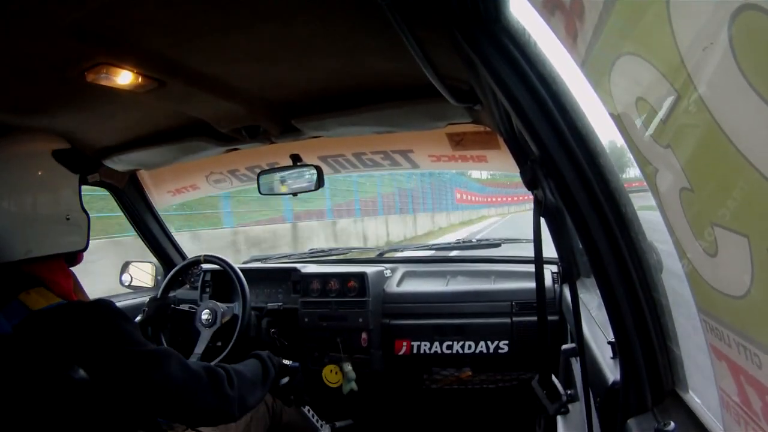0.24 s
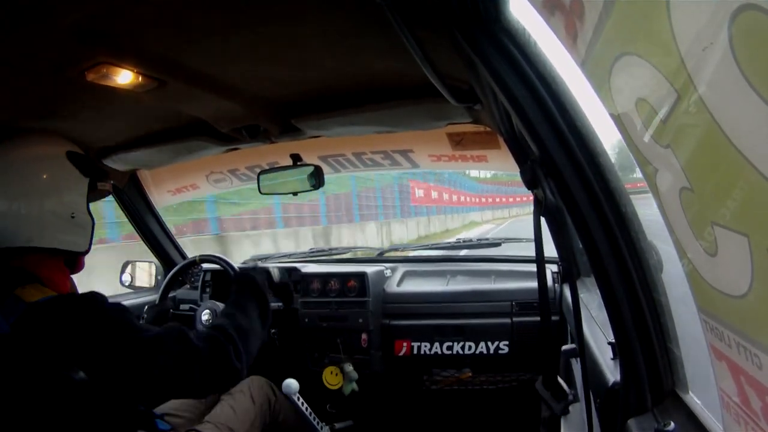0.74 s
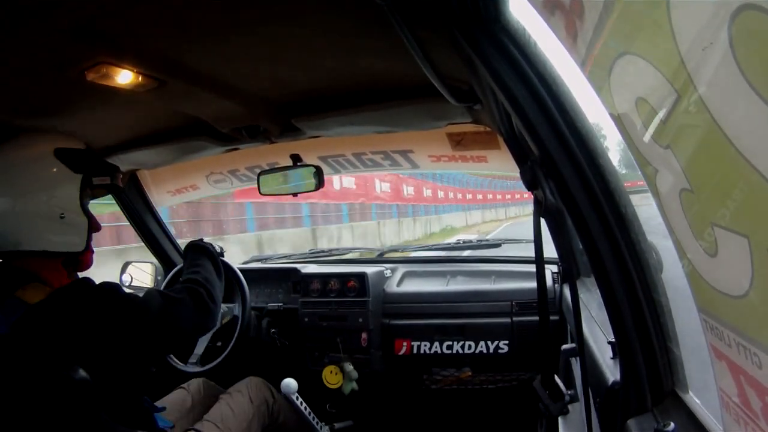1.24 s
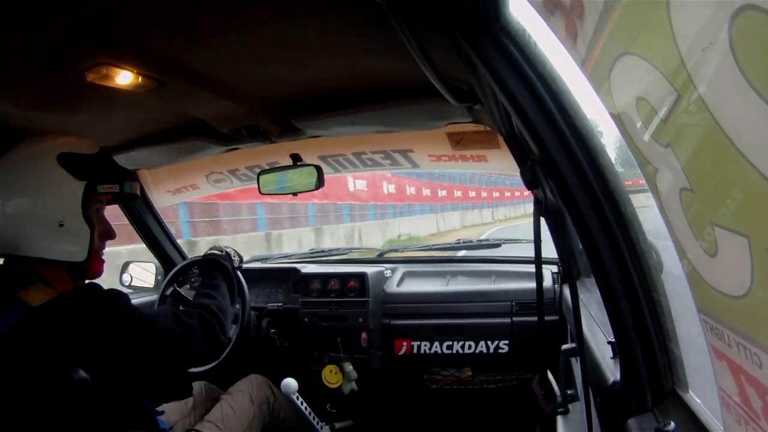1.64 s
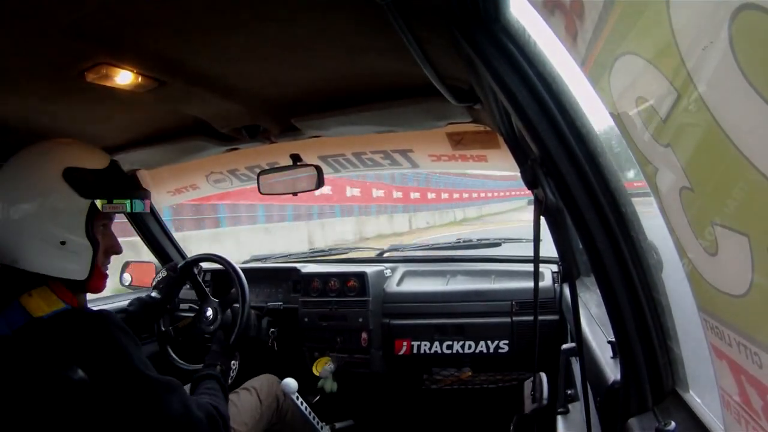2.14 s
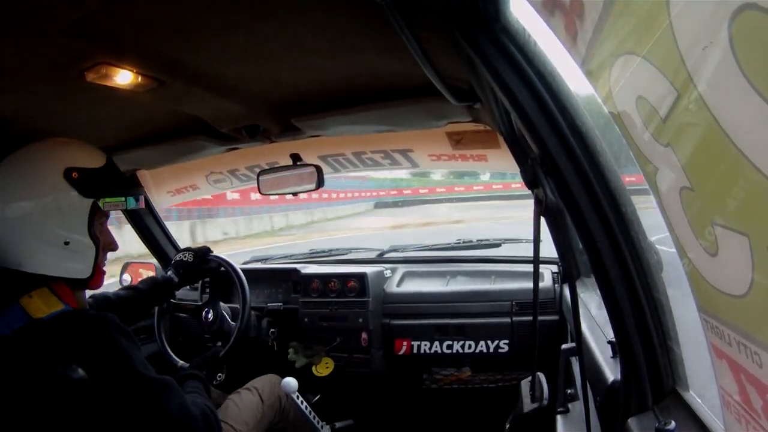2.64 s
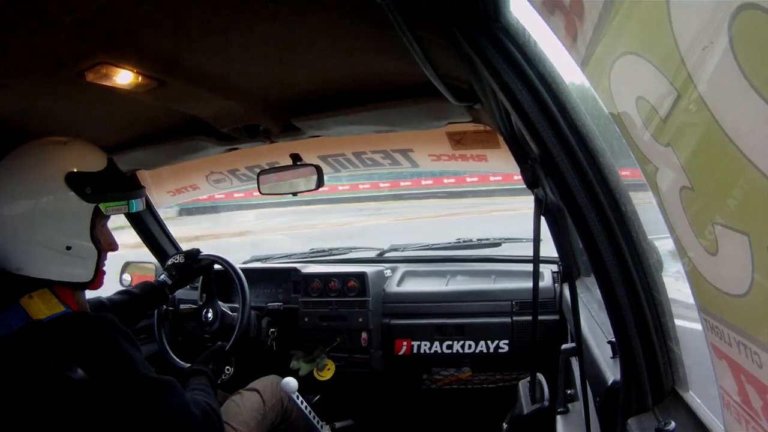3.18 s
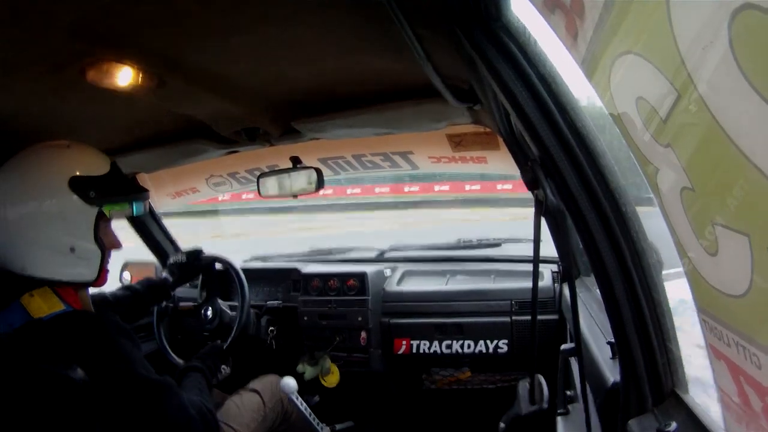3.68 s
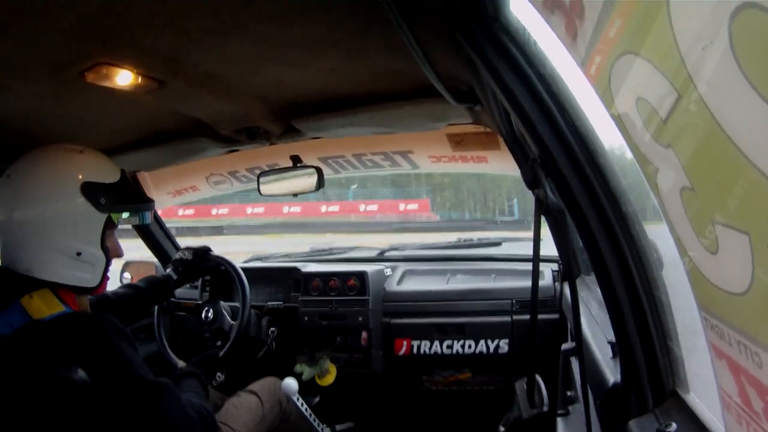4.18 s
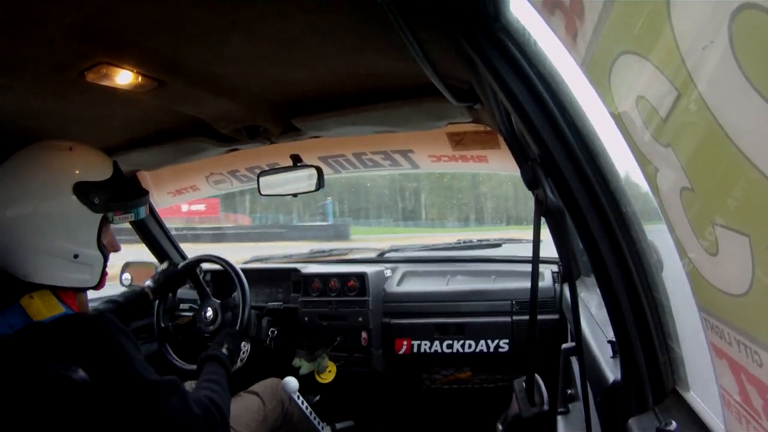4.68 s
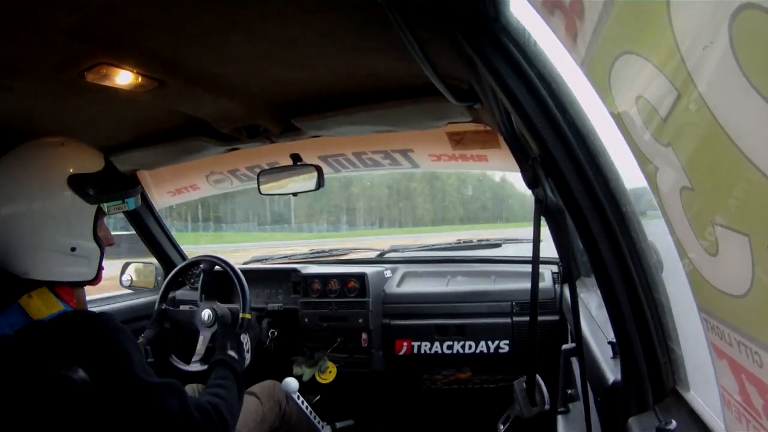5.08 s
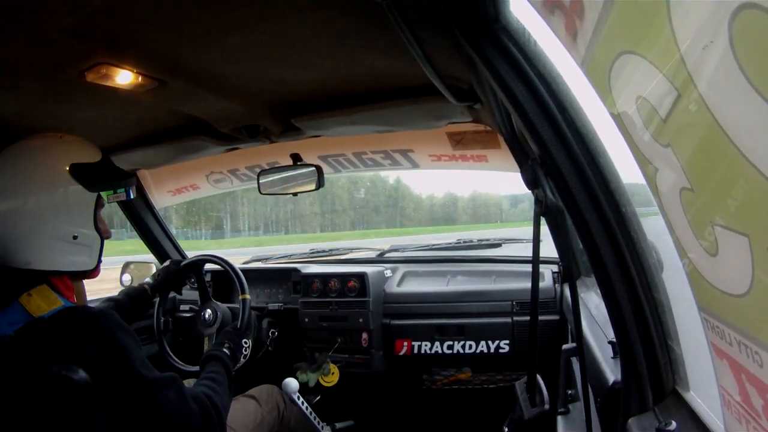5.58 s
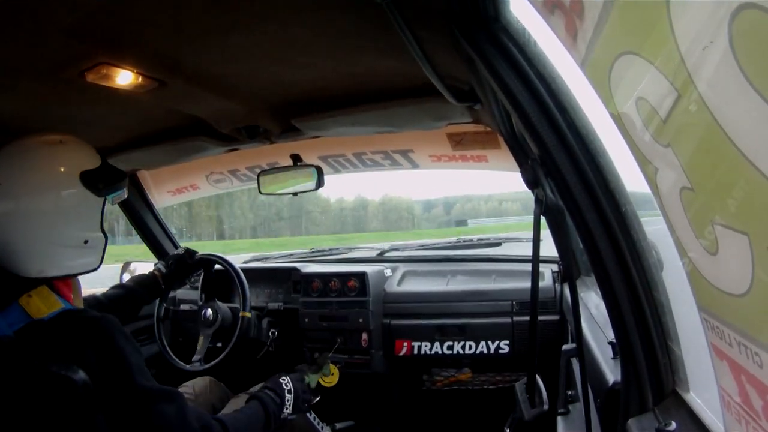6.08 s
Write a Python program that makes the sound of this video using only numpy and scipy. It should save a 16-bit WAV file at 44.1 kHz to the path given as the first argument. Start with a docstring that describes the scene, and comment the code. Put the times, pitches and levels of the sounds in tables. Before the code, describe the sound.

Inside a bare race car cabin, a four-cylinder engine flares, sags through a bend, takes a violent burst of knocks, then climbs again.

```python
"""Inside the bare cabin of a four-cylinder race car: the revs flare, sag through a bend and climb again.
Sines locked to the firings make the hum; filtered noise makes the boom, floor drumming, roar and whistle.
Loose trim ticks with the engine shake, and a bright crackle of clicked noise differs between the channels.
A kerb jolts the car into a burst of hard knocks, each a few dying modes with a thud and chatter.
All sources reach one microphone position, nearly mono, with brief dropouts and a faint hiss."""
import sys
import numpy as np
from scipy import signal
from scipy.fft import rfft, irfft
from scipy.io import wavfile
from scipy.ndimage import uniform_filter1d

SR = 44100
rng = np.random.default_rng(int(sys.argv[2]) if len(sys.argv) > 2 else 0)


def unload_audio(sound):
    """Save the sound as a 16-bit wav file, at the path given as the first command line argument."""
    columns = np.transpose(np.atleast_2d(sound))
    # keep every value between -1 and 1, then stretch to whole-number steps
    steps = np.round(np.clip(columns, -1, 1) * 32767)
    wavfile.write(sys.argv[1], SR, steps.astype(np.int16))


N = 278712


def undb(db):
    """Amplitude factor for a level in dB."""
    return 10 ** (np.asarray(db) / 20)


def unit(x):
    """Scale to an RMS of 1."""
    return x / np.sqrt(np.mean(x ** 2))


def curves(table):
    """Columns of a table joined by straight lines, one value a sample."""
    s, *columns = np.transpose(table)
    return [np.interp(np.arange(N) / SR, s, c) for c in columns]


def walk(rate):
    """Random levels held 1 / rate s and slewed twice; spread 1."""
    k = int(SR / rate)
    steps = np.repeat(rng.standard_normal(N // k + 1), k)
    return unit(uniform_filter1d(uniform_filter1d(steps, k), k)[:N])


def band(x, hz, width_hz):
    """One resonance, gain 1 at its centre."""
    return signal.lfilter(*signal.iirpeak(hz, hz / width_hz, SR), x)


def coloured(spectrum):
    """Noise of RMS 1 shaped by (f/Hz, level/dB) points joined on a logarithmic frequency axis."""
    hz, db = np.transpose(spectrum)
    bins = np.maximum(np.arange(N // 2 + 1) * SR / N, 1)
    gain = undb(np.interp(np.log(bins), np.log(hz), db))
    return unit(irfft(rfft(rng.standard_normal(N)) * gain, N))


def add(out, s, sound):
    """Mix a short sound in at time s."""
    i = int(s * SR)
    out[i:i + len(sound)] += sound[:N - i]


def ring(hz, t60, turn=0.):
    """A sine that dies by 60 dB in t60 seconds, starting at a given share of a turn."""
    t = np.arange(2048) / SR
    return np.sin(2 * np.pi * (hz * t + turn)) * np.exp(-np.log(1000) * t / t60)


def decay(t60):
    """A bare dying envelope from 1: a ring of 0 Hz that starts at its crest."""
    return ring(0, t60, .25)


def engine(hz, cycles, jolt):
    """A nearly pure firing tone; unequal cylinders add faint tones at quarters of its rate."""
    # firing tone, which swells and cancels as it sweeps through the shell's resonances: t/s, level/dB
    tones = [(0.0,-29.5),(0.11,-44),(0.21,-35),(0.37,-24),(0.455,-26),(0.478,-30),(0.495,-55),(0.535,-48),(0.56,-38),(0.6,-30),(0.7,-21.5),(0.99,-23),(1.09,-20.5),(1.3,-26),(1.52,-29.5),(1.65,-44),(1.75,-38.5),(2.4,-42.5),(2.8,-41.5),(2.99,-49),(3.2,-40.5),(3.6,-41.5),(3.72,-48),(4.2,-40),(4.45,-46.5),(4.6,-36.5),(5.35,-38),(5.7,-30.5),(6.0,-33.5),(6.07,-38),(6.16,-31),(6.32,-33)]
    # crank-turn tone before waver and kerb, against crank speed: f/Hz, level/dB
    crank = [(76, -58), (97, -55.5), (100.5, -41), (113, -39.5)]
    # how unevenly the cylinders fire: t/s, level/dB of in-between tones below rasp_hz, level/dB above
    uneven = [(0, -12, -4.5), (.6, -14, -9), (.9, -10, 2), (1.3, -1, 0.5), (1.8, -9, -7.5),
              (2.8, -6.5, -3.5), (3.7, -8, -4), (4.3, -6, 0), (5.3, 1, 0.5), (6.32, -9, 6)]
    # how an in-between tone gets through the shell, before the unevenness: f/Hz, level/dB
    through = [(38, -57), (50, -50.5), (80, -67), (117, -47), (140, -83), (235, -58), (290, -51),
               (315, -54.5), (350, -75.5), (400, -60.5), (480, -58.5), (600, -62), (680, -63.5), (750, -81),
               (930, -78), (1050, -66), (1200, -84.5), (1370, -75), (1500, -83), (1630, -75), (1850, -81.5)]
    # overtones against the firing tone: multiple of the firing rate, level/dB
    overtones = [(2, -37), (3, -29)]
    # multiples of the firing rate raised or lowered against their neighbours: multiple, level/dB
    offsets_db = dict([(2.75, 4), (3, -3), (3.5, 2)])
    rasp_hz = 330
    turn = 2 * np.pi * cycles

    tone_db, = curves(tones)
    crank_db = np.interp(hz / 2, *np.transpose(crank)) + 3 * walk(11) + 16 * jolt
    uneven_db, rasp_db = curves(uneven)
    through_hz, through_db = np.transpose(through)

    wavering_db = tone_db + 1.04 * walk(11) + 0.93 * walk(30)
    out = undb(wavering_db) * np.sin(turn + .1 * walk(7))  # phase wanders by 0.1 rad
    out += undb(crank_db) * np.sin(turn / 2)  # two firings a crank turn
    for multiple, db in overtones:
        overtone_db = db + tone_db + 2.5 * walk(5)
        out += undb(overtone_db) * np.sin(multiple * turn + .3 * walk(10))
    for multiple in [k / 4 for k in range(1, 48) if k not in (2, 4)]:
        line_hz = multiple * hz
        db = np.interp(np.log(line_hz), np.log(through_hz), through_db)
        db = db + np.where(line_hz < rasp_hz, uneven_db, rasp_db)
        db = db + offsets_db.get(multiple, 0) + 2.2 * walk(4)
        out += undb(db) * np.sin(multiple * turn + .15 * walk(9))
    return np.sqrt(2) * out  # levels are RMS


def cabin(cycles, boom_db, drum_db, roar_db):
    """Road shocks ring the air volume and floor pan; the roar pulses with firings, the shell sings evenly."""
    # body shell resonances in the roar: f/Hz, width/Hz, relative level/dB
    shell_modes = [(467.6, 80, 1.5), (916, 83, 3), (1337, 26.6, -7.5), (1631, 25, -6), (2035, 110, -10.5),
                   (3156, 39, -24), (3454, 124, -10.5), (3640, 120, -14), (4780, 870, -13.5)]
    # spectrum of the pulsing roar: f/Hz, relative level/dB per Hz
    roar_spectrum = [(13, -15), (22, -20), (102, -3), (159, -6.5), (253, -2), (352, -21.5), (462, -13.5),
                     (717, -10.5), (918, -14), (1180, -16.5), (1630, -15), (2400, -25.5), (2880, -26.5),
                     (3430, -29), (4040, -41), (15500, -92)]

    # the air volume holds one low note whose pitch wanders with the shocks
    note_level = np.sqrt(2) * undb(1.6 * walk(14))
    note = note_level * np.sin(2 * np.pi * np.cumsum(48 + 3.565 * walk(25)) / SR)
    rumble = unit(band(band(rng.standard_normal(N), 44.0, 24), 38.0, 30))
    boom = unit(note + 0.45 * rumble)

    drum = unit(band(band(band(rng.standard_normal(N), 229.6, 91), 207, 110), 223, 110))

    puffs = undb(1.5 * walk(80)) * (1 + .35 * np.sin(2 * np.pi * cycles))
    shell = np.zeros(N)
    for hz, width_hz, db in shell_modes:
        mode = band(band(rng.standard_normal(N), hz, 2 * width_hz), hz, width_hz)
        shell += undb(db) * unit(mode)
    roar = undb(-1.5) * unit(shell) + puffs * coloured(roar_spectrum)
    return undb(boom_db + 0.5) * boom + undb(drum_db + 0.5) * drum + undb(roar_db - 1.5) * roar


def strike(modes, spread, crack, rise_s):
    """One blow: a broad crack and modes slightly off pitch and level, after a brief rise; peak 1."""
    chance = rng.standard_normal((len(modes), 2))
    sound = np.zeros(2048)
    for (hz, db, t60), (detune, uplift) in zip(modes, chance):
        sound += undb(db + 2 * uplift) * ring(hz * (1 + spread * detune), t60)
    noise = band(band(rng.standard_normal(2048), 6500, 3800), 6500, 4400)
    rise = 1 - np.exp(-np.arange(2048) / SR / rise_s)
    sound = (sound + crack * noise * decay(0.0081)) * rise
    return sound / np.abs(sound).max()


def trim(cycles, shake_db):
    """Each firing may throw a loose part at its neighbour: it lands a tap or barely touches, in runs."""
    # loudest ticks of the trim: t/s, peak level/dB
    loud_ticks = [(0.0084, -37), (0.0232, -43), (0.031, -42), (0.0373, -48.5), (0.0414, -47), (0.053, -45),
                  (0.2423, -41), (0.2947, -40.5), (0.3787, -43), (0.398, -34), (0.4209, -33), (0.4353, -34),
                  (0.4515, -38), (0.576, -40), (0.5887, -35), (0.624, -43), (0.6431, -39), (0.6512, -37),
                  (0.6666, -29), (0.6784, -40), (0.7023, -31), (0.7104, -31.5), (0.7259, -31), (0.734, -31),
                  (0.755, -35), (0.7674, -37), (0.779, -39), (0.7981, -32), (0.813, -34.5), (0.8182, -36),
                  (0.8323, -38), (0.8387, -34), (0.852, -40), (0.863, -37), (0.877, -37), (0.8964, -32.5),
                  (0.912, -37), (0.9158, -34), (0.937, -32), (0.9504, -35), (0.956, -33), (0.9684, -39.5),
                  (1.013, -34), (1.0316, -36), (1.05, -31), (1.0585, -34), (1.0687, -26), (1.0747, -38),
                  (1.0874, -31), (1.106, -33), (1.128, -36), (1.148, -30), (1.1616, -40), (1.171, -30.5),
                  (1.1898, -34), (1.209, -37.5), (1.2177, -36), (1.333, -40), (1.414, -44), (1.4255, -45),
                  (1.456, -43), (1.5317, -48), (1.5468, -43), (1.7452, -28), (1.922, -44.5), (1.9986, -41),
                  (2.0974, -46), (2.1147, -42), (2.277, -46), (2.4279, -44), (2.456, -45), (2.4866, -41),
                  (2.589, -43.5), (2.809, -44), (3.087, -42.5), (3.242, -44), (3.2499, -44), (3.3518, -47),
                  (3.418, -40.5), (3.4369, -44), (3.458, -44), (3.5416, -43.5), (3.5685, -43.5),
                  (3.6271, -37.5), (3.6344, -47), (3.6735, -40), (3.7748, -48), (3.8117, -42), (3.826, -40),
                  (3.8363, -29), (3.869, -36), (3.8904, -27.5), (4.032, -36), (4.0607, -34), (4.0714, -33),
                  (4.0814, -35), (4.096, -22), (4.1, -26), (4.1108, -22), (4.1197, -36), (4.143, -40),
                  (4.15, -34), (4.1571, -37), (4.167, -38), (4.1819, -34.5), (4.1994, -36), (4.2101, -35),
                  (4.2328, -38), (4.2864, -40), (4.3066, -39), (4.315, -42), (4.339, -42), (4.372, -45),
                  (4.3954, -44), (4.3986, -39), (4.422, -48), (4.4523, -39), (4.4734, -46), (4.4936, -46),
                  (4.5228, -38.5), (4.546, -42), (4.579, -39.5), (4.6026, -40.5), (4.6118, -41),
                  (4.6265, -46), (4.637, -42), (4.6627, -40.5), (4.6679, -42), (4.7012, -42), (4.7206, -41),
                  (4.7246, -44), (4.788, -41.5), (4.8125, -41), (4.831, -43), (4.84, -41), (4.8483, -40),
                  (4.8705, -44), (4.8958, -36), (4.9136, -46), (4.929, -35), (4.9742, -43), (5.005, -45),
                  (5.0196, -47), (5.0286, -46), (5.0445, -40), (5.0617, -41), (5.0857, -39), (5.1168, -42),
                  (5.1397, -35), (5.16, -43), (5.184, -40), (5.217, -37.5), (5.2228, -39), (5.2456, -45),
                  (5.2646, -47), (5.347, -35.5), (5.3628, -48), (5.3973, -40.5), (5.4353, -47),
                  (5.4534, -44), (5.4712, -47), (5.4789, -41), (5.492, -45), (5.502, -38.5), (5.5155, -41),
                  (5.5236, -46), (5.536, -40), (5.5406, -41), (5.5558, -37.5), (5.5614, -43), (5.5667, -43),
                  (5.5867, -36), (5.5969, -43), (5.6121, -44), (5.6196, -40), (5.6303, -40), (5.6538, -39),
                  (5.658, -38.5), (5.6644, -41), (5.6733, -40), (5.691, -35), (5.6974, -39), (5.708, -40),
                  (5.7134, -40), (5.7221, -45), (5.7264, -43), (5.7417, -41), (5.7478, -40), (5.7517, -41),
                  (5.7568, -43), (5.77, -40), (5.792, -40), (5.8043, -47), (5.814, -43), (5.852, -46),
                  (5.871, -40), (5.894, -45), (5.905, -37), (5.9176, -42), (5.926, -43), (5.9379, -41),
                  (5.9654, -41), (5.9771, -45), (5.9864, -37.5), (6.0112, -47), (6.029, -43), (6.0517, -43),
                  (6.0829, -44), (6.091, -44), (6.1046, -48), (6.1342, -44), (6.168, -42), (6.1981, -44),
                  (6.2178, -42), (6.239, -36), (6.264, -40), (6.2794, -44), (6.2917, -44), (6.301, -40)]
    # ringing of the struck trim: f/Hz, relative level/dB, t60/s
    tick_modes = [(3161.4, -7, 0.023), (4148, 1.5, 0.0086), (4430, -6, 0.014), (4715, -7, 0.012),
                  (6000, -3.5, 0.0047), (7200, -9, 0.005)]
    # how hard each cylinder's firing throws the trim: relative level/dB
    cylinder_db = np.array([-1.5, 1, -2.5, -1])
    tap_lag = .88  # firings from the throw to the tap

    out = np.zeros(N)
    firing = np.flatnonzero(np.diff(np.floor(cycles - tap_lag)))
    cylinder = np.floor(cycles[firing + 1] - tap_lag + 1).astype(int) % len(cylinder_db)
    throw_db = cylinder_db[cylinder]
    chance = rng.standard_normal((len(firing), 3))
    # near 1 the part lands, near -1 it barely touches; the slow walk makes the runs
    lands = np.tanh(1.5 * (walk(50)[firing] + chance[:, 1]))
    lands = np.tanh(lands + throw_db / 4 + (shake_db[firing] - shake_db.mean()) / 12)
    size_db = shake_db[firing] + 6.5 + throw_db + 7 * lands + 1.3 * chance[:, 2]
    tap_s = firing / SR + .0005 * np.abs(chance[:, 0])
    for s, db in list(zip(tap_s, size_db)) + list(loud_ticks):
        add(out, s, undb(db) * strike(tick_modes, .014, 0.64, 0.00026))
    return out


def crackle_swells():
    """Level of the bright crackle in relative dB: a quiet floor with brief swells."""
    # swells of the crackle: t/s of the peak, relative level/dB
    swell_peaks = [(0.005, -72), (.18, -72), (0.29, -64), (0.39, -71), (.48, -70), (0.68, -52),
                   (0.89, -52.5), (.93, -56), (.97, -53), (1.1, -45), (1.13, -46), (1.15, -57.5),
                   (1.33, -73.5), (3.829, -42.5), (3.858, -51), (3.893, -43), (3.922, -55), (3.946, -41.5),
                   (3.981, -34.5), (4.008, -51), (4.035, -47.5), (4.095, -40), (4.115, -46), (4.15, -55.5),
                   (4.18, -53), (4.31, -58)]
    rest_db, slope_db_per_s = -72, 545
    t = np.arange(N) / SR
    swells = [db - slope_db_per_s * np.abs(t - s) for s, db in swell_peaks]
    return np.max([rest_db + 0 * t] + swells, axis=0)


def crackle(crackle_db):
    """Bright crackle, as of sound cutting in and out: random clicks of noise, differing between channels."""
    # loudest clicks of the crackle: t/s, relative level/dB
    loud_clicks = [(.6908, -39), (.8441, -43), (.8634, -38), (.8831, -39), (.8906, -37), (.903, -39),
                   (.9299, -36), (.969, -39), (.9812, -43), (1.0445, -40), (1.1, -40), (1.1176, -40),
                   (1.1481, -37), (3.827, -35), (3.8303, -38), (3.8572, -36), (3.9786, -30), (4.0062, -34),
                   (4.0217, -30), (4.0752, -31), (4.0995, -31), (4.1203, -35), (4.126, -41)]
    clicks_per_s, spread_db = 500, 2.2

    chance = rng.random((N, 2))
    sizes = undb(-spread_db * np.log(chance[:, 1] + 0.0096))
    clicks = (chance[:, 0] < clicks_per_s / SR) * sizes
    grit = undb(crackle_db - 4) * unit(signal.fftconvolve(clicks, decay(0.011))[:N])
    for s, db in loud_clicks:
        add(grit, s, undb(db - 3) * decay(.004))
    mid, side = (unit(band(rng.standard_normal(N), 4500, 8000)) for _ in range(2))
    return grit * (mid + .55 * side * np.array([[1], [-1]]))


def knocks():
    """Hard parts meet: short modes, a thud of the floor and a scatter of chatter behind. The blow at 1.109 s is
    instead a sharp onset just as the sound drops out."""
    # t/s, blow level/dB, relative thud level/dB, pitch as a share of the modes, treble tilt/dB per octave
    blows = [(.775, -33, -62, 0.74, -11), (1.109, -21, -41.5, 0.62, 8.5), (1.323, -25, -47, 0.94, -18),
             (1.567, -28, -26, 0.93, -5.5), (1.945, -34, -50, 0.76, -9), (2.114, -35, -45, 0.94, -6.5),
             (2.223, -31.5, -61, 1.38, -10), (2.246, -35, -57, 1.2, -2.5), (2.275, -36, -75, 1.6, -12),
             (3.823, -26, -43, 1.27, -8), (3.846, -21, -53, 1.37, -6), (3.850, -11.5, -17.5, 1.02, -2.5),
             (3.859, -39, -48, 1.4, 12), (3.89, -23.5, -44, 1.06, 7), (3.916, -35, -44, 1.4, 1),
             (3.921, -29, -43.5, 1.5, -1), (3.937, -7.5, -10.5, 1.03, 4), (3.945, -3, -15.5, 1.2, -1.5),
             (3.9669, -8, -46, 1.05, -1), (3.978, -26, -40, 0.94, 3), (3.995, -5, -35, 1.04, -0.5),
             (4.006, -40, -29, 1.3, -1), (4.019, -28, -23, 1.2, -2), (4.028, -24, -12.5, 1.01, -7),
             (4.048, -38, -17.5, 0.93, 1), (4.0854, -13, -25, 0.996, -1), (4.144, -29, -27, 1.2, -2)]
    # ringing of the struck parts at pitch 1: f/Hz, relative level/dB, t60/s
    knock_modes = [(980, -17, 0.035), (1047, -4.5, 0.019), (1234, 0, 0.0057), (1503, 1.5, 0.01),
                   (1810, -3.5, 0.011), (2430, -1, 0.0098), (3120, -7, 0.015), (4530, -13.5, 0.012)]

    out = np.zeros(N)
    for s, db, thud_db, pitch, tilt_db in blows:
        # dB short of a hard knock: softer ones push longer and rattle on
        soft = max(-22 - db, 0)
        rattle = band(band(rng.standard_normal(2048), 2100, 2300), 2000, 3700)
        chatter = rattle * decay(0.04 + 0.0025 * soft)
        modes = []
        for hz, mode_db, t60 in knock_modes:
            octaves = np.log2(hz / knock_modes[0][0])
            modes.append((hz * pitch, mode_db + tilt_db * octaves, t60))
        blow = strike(modes, .02, 0.3 * undb(2 * tilt_db), .00035 + 0.00014 * soft)
        blow = blow + (.3 + 0.13 * soft) * undb(tilt_db) * chatter
        blow = blow / (1 + 0.079 * soft)
        thud = ring(205 * (1 + 0.072 * rng.standard_normal()), 0.047) * (1 - decay(0.012))
        add(out, s + .0006, undb(db) * blow + undb(thud_db + 4.0) * thud)
    return out


def whistle():
    """Two breathy, fluttering lines of narrow noise in the treble, strongest while the revs fall."""
    # lower line before its flutter: t/s, level/dB
    whistle_level = [(0, -100), (.8, -86), (1.2, -81), (1.32, -76), (1.55, -82), (1.75, -95), (6.32, -105)]
    db, = curves(whistle_level)
    flutter = undb(db + 3 * walk(25))
    low_line = unit(band(rng.standard_normal(N), 8980, 90))
    high_line = unit(band(rng.standard_normal(N), 10200, 120))
    return flutter * (low_line + 1.4 * high_line)


def kerb():
    """How hard the kerb shakes the car, 0-1: a quick rise, a hold, a dying fade."""
    start_s, rise_s, hold_s, fade_s = 3.785, 0.011, 0.31, 0.12
    t = np.arange(N) / SR - start_s
    return np.clip(t / rise_s, 0, 1) * np.exp(-np.maximum(t - rise_s - hold_s, 0) / fade_s)


def scene():
    """All sources reach one spot in the cabin; the kerb lifts drumming, roar, trim shake and crank tone."""
    # engine speed: t/s, firing rate f/Hz
    revs = [(0.0, 179.7), (0.11, 176.4), (0.21, 175.1), (0.38, 209.1), (0.46, 220.3), (0.52, 224.8),
            (0.68, 216.2), (0.86, 201.1), (1.09, 216.9), (1.3, 199.7), (1.52, 185.4), (1.65, 175.9),
            (1.8, 161.4), (2.4, 152.0), (2.65, 155.8), (2.95, 152.2), (3.17, 159.9), (3.4, 153.3),
            (3.7, 156.6), (4.3, 163.2), (4.85, 169.7), (5.35, 176.5), (5.7, 180.8), (6.32, 194.2)]
    # cabin apart from the kerb: t/s, relative level/dB of floor drumming, of roar, of trim shake
    cabin_levels = [(0.0, -37, -41, -53), (0.1, -39.5, -42.5, -71), (0.3, -36.5, -42, -61),
                    (0.42, -44, -37.5, -54), (0.47, -38, -41.5, -60), (0.5, -45, -37.5, -54),
                    (0.54, -33, -38.5, -54.5), (0.62, -41, -39, -58), (0.85, -46, -37.5, -54),
                    (0.99, -46, -38.5, -55.5), (1.12, -58, -36.5, -51), (1.22, -38, -39.5, -61),
                    (1.4, -38, -41, -56), (1.7, -41, -47, -64), (2.2, -42.5, -49.5, -75.5),
                    (2.75, -47, -50, -64), (3.3, -46.5, -49, -68), (3.6, -41.5, -49.5, -58.5),
                    (3.77, -45.5, -50, -63.5), (4.45, -43, -48, -65.5), (5.3, -49, -45, -62),
                    (5.42, -41.5, -46.5, -65), (5.65, -45.5, -45, -58), (5.95, -45, -44, -60),
                    (6.32, -41, -43.5, -58.5)]
    # low boom, swelling with the road: t/s, relative level/dB
    boom_level = [(0.0, -33), (0.14, -45), (0.42, -39.5), (0.5, -47), (0.56, -38), (0.69, -47), (0.76, -52),
                  (0.86, -37), (1.04, -45), (1.11, -37), (1.27, -48.5), (1.65, -41), (1.69, -49.5),
                  (2.73, -47), (2.8, -38.5), (3.33, -58), (3.41, -37), (3.77, -55.5), (3.8, -34),
                  (4.54, -43), (4.61, -54), (4.79, -39), (5.09, -47), (5.14, -36.5), (5.33, -54),
                  (5.49, -41), (5.7, -49.5), (5.95, -38), (6.32, -43)]

    hz, = curves(revs)
    drum_db, roar_db, shake_db = curves(cabin_levels)
    boom_db, = curves(boom_level)
    jolt = kerb()
    cycles = np.cumsum(hz) / SR  # firings so far
    mid = engine(hz, cycles, jolt)
    mid += cabin(cycles, boom_db, drum_db + 10.5 * jolt + 1.77 * walk(12), roar_db + 11 * jolt)
    mid += trim(cycles, shake_db + 5 * jolt)
    mid += knocks()
    mid += whistle()
    return mid + crackle(crackle_swells())


def record(dry):
    """Brief dropouts, a faint random treble difference and hiss by channel, no deepest bass and no top."""
    # instants when the sound drops out: t/s of the middle, length/s
    dropouts = [(.6901, .001), (1.056, .0007), (1.0928, .0008), (1.1113, .0013), (1.1231, .0006),
                (1.1302, .0008), (3.8488, .0014), (3.8595, .0012), (3.9419, .0023), (3.9672, .0013),
                (3.9771, .0007), (4.0052, .0017), (4.0207, .0012), (4.0745, .0014), (4.0849, .0008),
                (4.1195, .0009)]
    t = np.arange(N) / SR
    live = 1 - sum(np.abs(t - s) < length / 2 for s, length in dropouts)
    gate = uniform_filter1d(1. * live, size=12)  # softened edges
    hiss = np.array([coloured([(2000, -34.5), (5000, -20), (8000, 11), (15000, 7)]) for _ in dry])
    # faint random treble difference between the channels
    side = undb(-49) * walk(200) * band(dry[0], 13000, 7200)
    heard = (dry + np.array([side, -side])) * gate + undb(-70.0) * hiss
    low_cut = signal.sosfilt(signal.butter(2, 22, "high", fs=SR, output="sos"), heard)
    # steep treble cut at 15.7 kHz
    return signal.sosfilt(signal.ellip(8, .2, 70, 15700, fs=SR, output="sos"), low_cut)


dry = scene()
out = record(dry)
unload_audio(out)
```